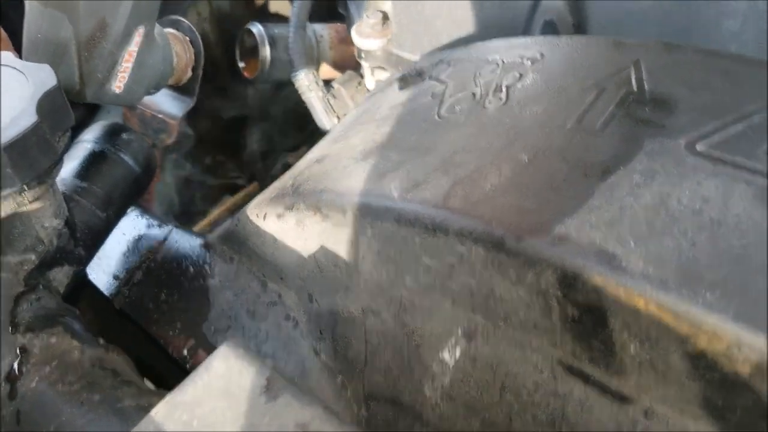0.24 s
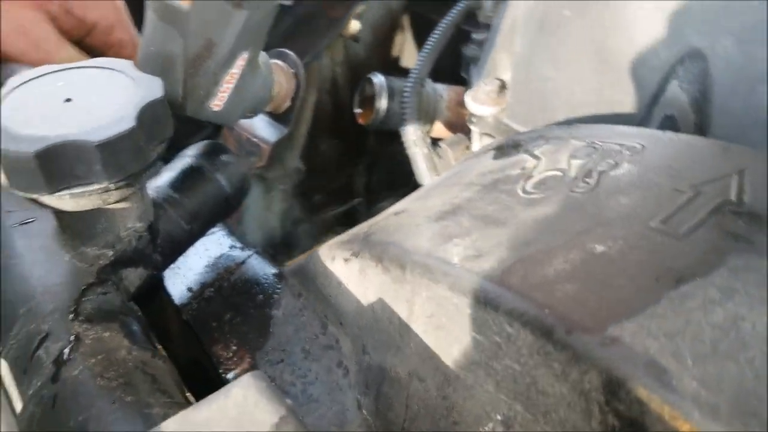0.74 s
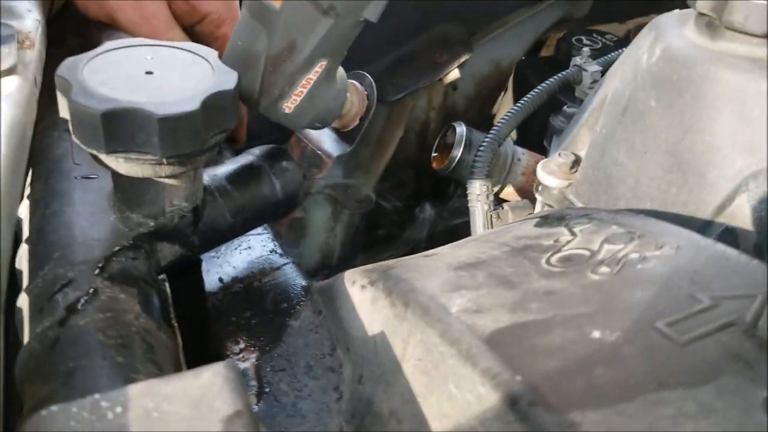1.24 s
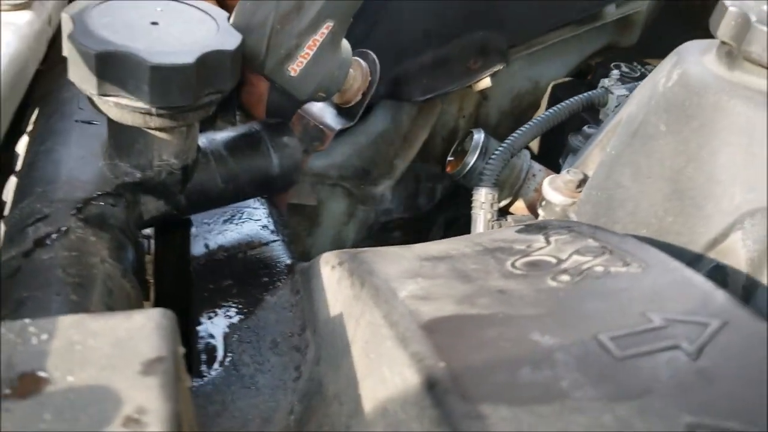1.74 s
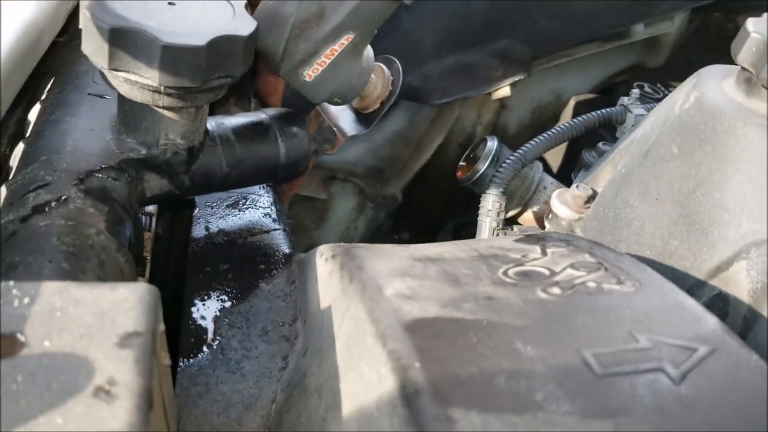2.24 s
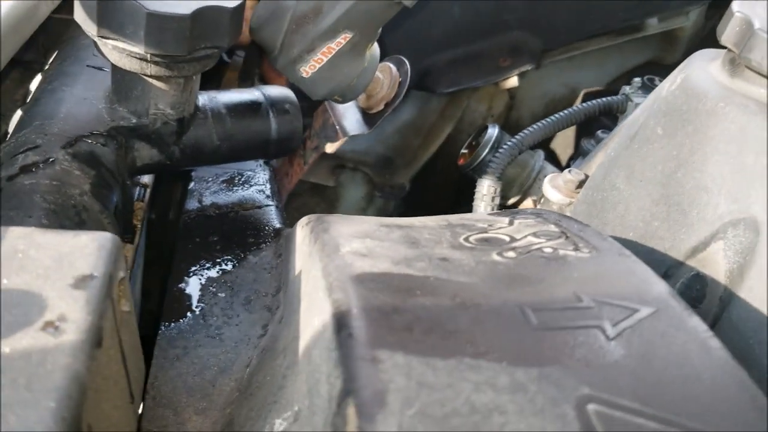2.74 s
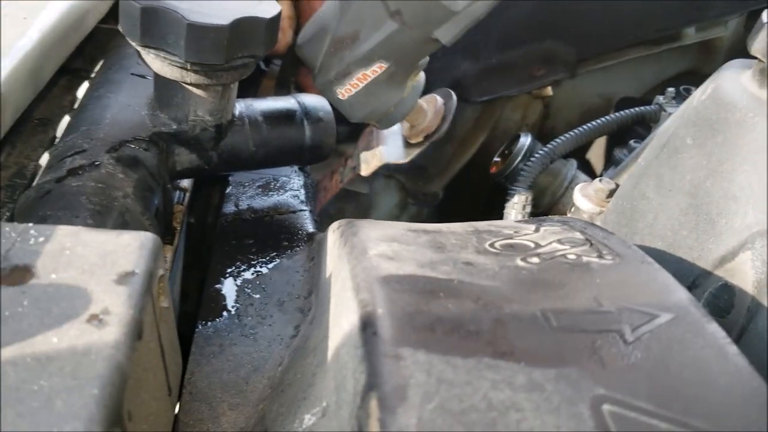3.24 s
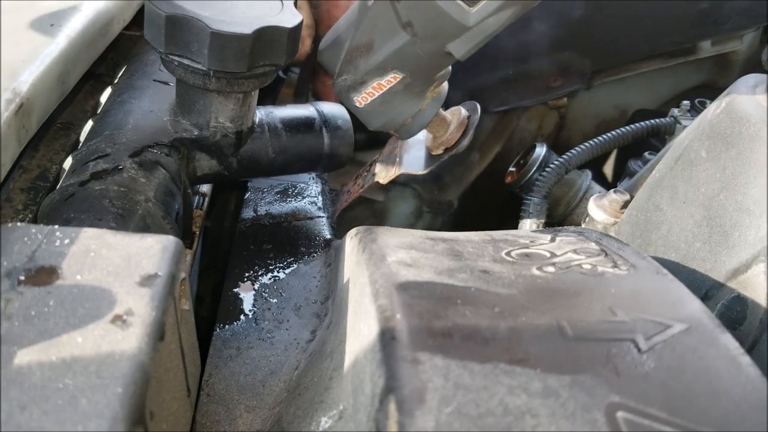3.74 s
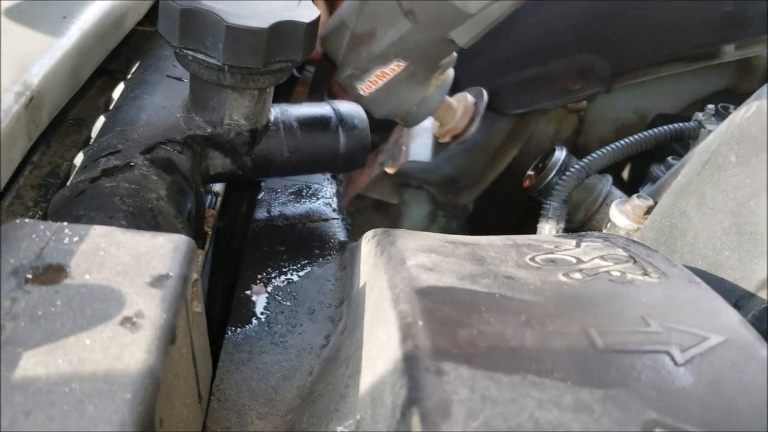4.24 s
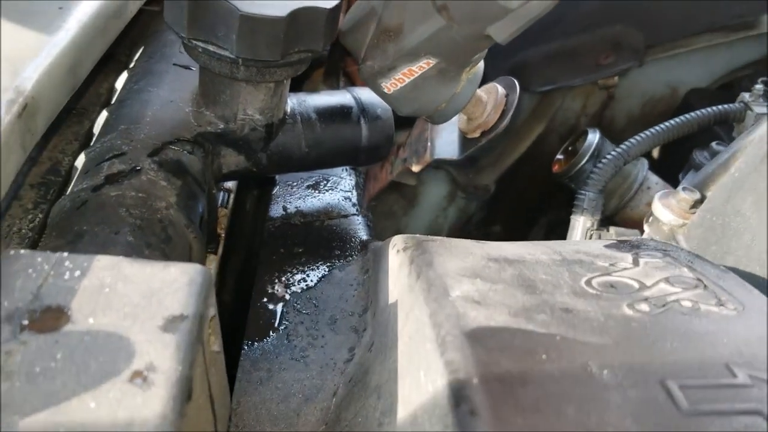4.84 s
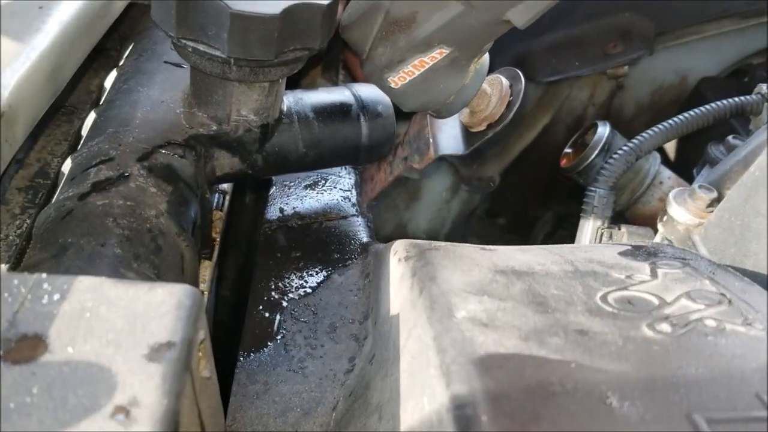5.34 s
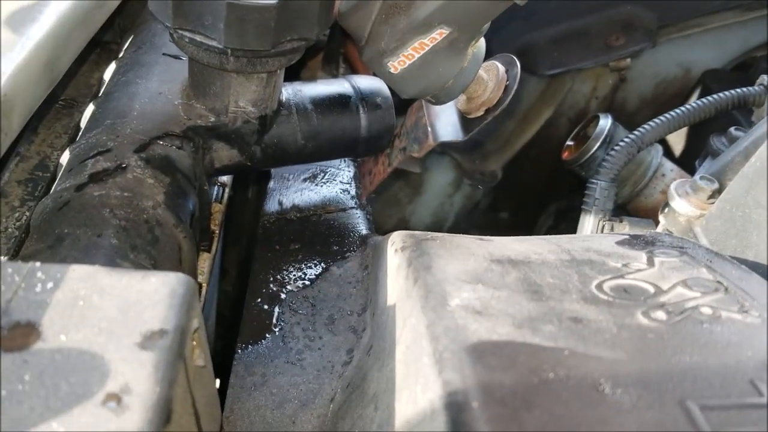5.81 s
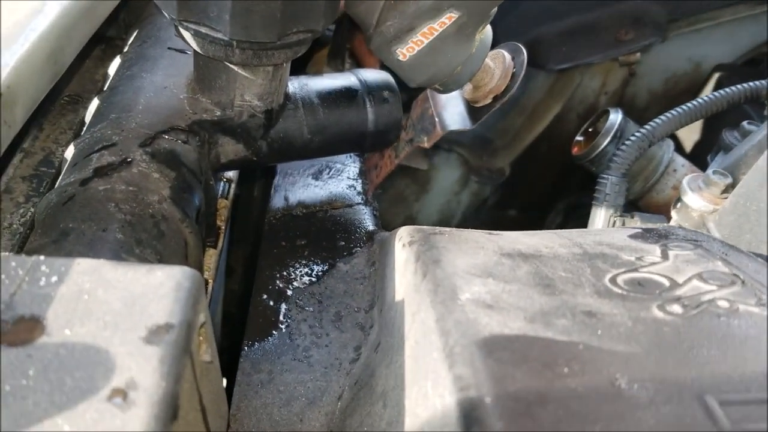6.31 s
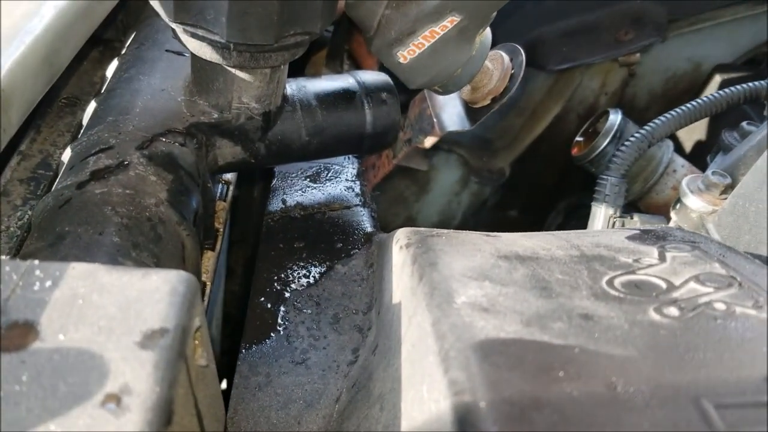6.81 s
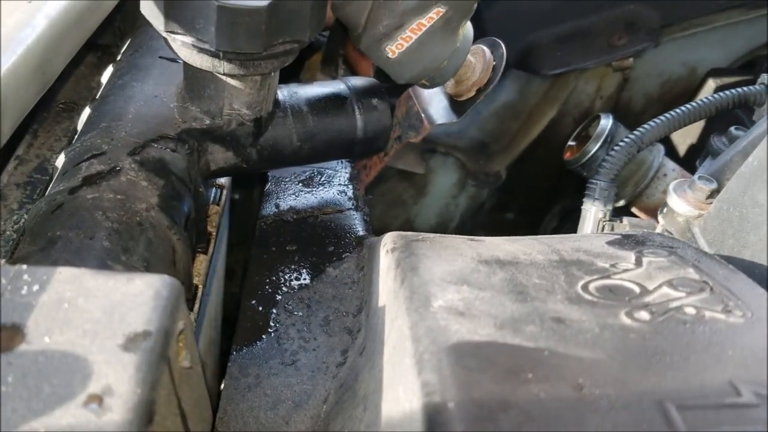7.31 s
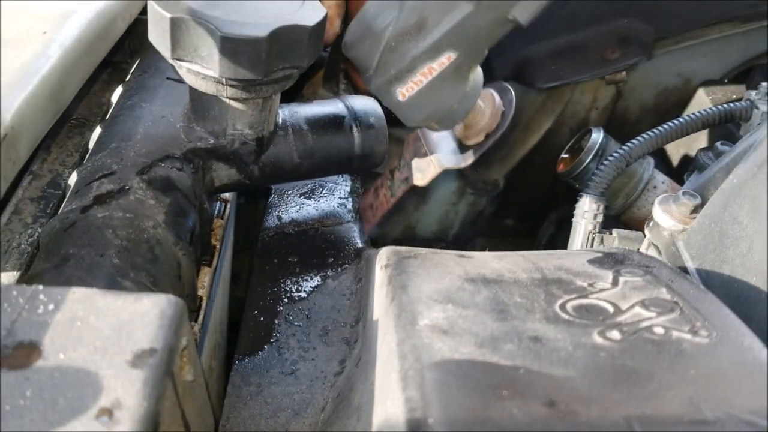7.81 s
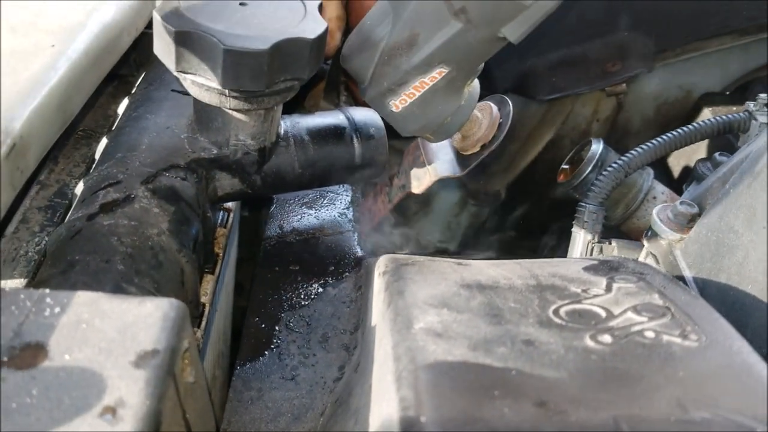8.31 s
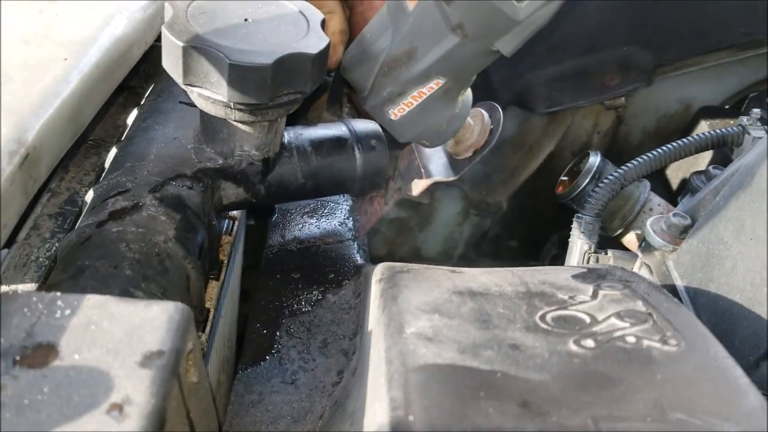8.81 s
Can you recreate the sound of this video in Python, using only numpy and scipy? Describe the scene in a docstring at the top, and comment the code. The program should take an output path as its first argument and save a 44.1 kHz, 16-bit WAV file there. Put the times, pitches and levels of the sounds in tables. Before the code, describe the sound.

An oscillating multi-tool saws a hollow plastic part in a car engine bay, very close to a stereo microphone. A low hum and nasal buzz sit under a bright, ringing, hissing blade, mostly on the left. It cuts off abruptly, leaves about half a second of quiet workshop air with faint metal ticks, then restarts and saws on, chattering at moments.

```python
"""An oscillating multi-tool saws at a plastic part in a car's engine bay, close to the stereo microphone. It
stops once and restarts. Its swing hums through the plastic, which buzzes at multiples of the stroke rate; the
teeth strike the steel blade in every stroke, evenly when they bite and in a rattle when they skate. The blade
rings and hisses, mostly on the left, and reflections from the bay smear its blows within milliseconds. The
housing rumbles, a thin whine, a metal tink, a click and the ping of the switch mark the restart, and the
workshop air is quiet."""
import sys
import numpy as np
from scipy import signal
from scipy.fft import rfft, irfft, next_fast_len
from scipy.io import wavfile
from scipy.ndimage import uniform_filter1d, map_coordinates

SR = 44100
rng = np.random.default_rng(int(sys.argv[2]) if len(sys.argv) > 2 else 0)


def wav_out(sig):
    """Save sig, one row per channel (or a flat mono array), as 16-bit PCM at SR to the path in sys.argv[1]."""
    wavfile.write(sys.argv[1], SR, np.round(np.clip(np.atleast_2d(sig).T, -1, 1) * 32767).astype(np.int16))


N = 399546


def amp(db):
    """Decibels to gain."""
    return 10 ** (np.asarray(db) / 20)


def unit(x):
    """x at rms 1."""
    return x / np.sqrt(np.mean(x ** 2) + 1e-20)


def seconds():
    """The time of every sample."""
    return np.arange(N) / SR


def colour(points, hz):
    """Gain of (frequency [Hz], gain [dB]) points on a log axis."""
    f, db = np.transpose(points)
    return amp(np.interp(np.log(hz + 1), np.log(f), db))


def curves(rows):
    """One value per sample for each column after the time; stretches are joined."""
    s, *cols = np.vstack(rows).T
    return [np.interp(seconds(), s, c) for c in cols]


def wobble(rate, at):
    """A smooth random curve, rate knots a second, read at the given seconds."""
    return map_coordinates(rng.standard_normal(4096), [at * rate], mode="mirror")


def bumps(events, length_s):
    """A smooth bump for each (time [s], strength) event, down to 1/e at length_s from its middle."""
    t = seconds()
    return sum(strength * np.exp(-((t - s) / length_s) ** 2) for s, strength in events)


def spells(events, edge_s):
    """A plateau with ramps of edge_s, centred on its ends, for each (start [s], end [s], strength) event."""
    t = seconds()
    total = 0
    for start, end, strength in events:
        inside_s = np.minimum(t - start, end - t)
        total = total + strength * np.clip(.5 + inside_s / edge_s, 0, 1)
    return total


def filtered(x, response):
    """x times a response of frequency."""
    m = next_fast_len(N + 8192, True)
    return irfft(rfft(x, m) * response(np.fft.rfftfreq(m, 1 / SR)), m)[..., :N]


def band(hz, low_hz, high_hz):
    """A band-pass with steep skirts."""
    return 1 / np.sqrt((1 + (low_hz / (hz + 1)) ** 40) * (1 + (hz / high_hz) ** 40))


# balance of the two microphone ports: (frequency [Hz], right minus left [dB])
PORT_SHADOW = [(150, -7), (600, 3.5), (1200, -6), (2000, -14.5), (3000, -15.5), (4000, -16), (5200, -22.5),
               (7000, -25), (10000, -32.5), (13000, -24), (15800, -34)]


def ports(hz):
    """Gains of the two microphone ports: the right one lies in the shadow of the camera."""
    right = colour(PORT_SHADOW, hz)
    return np.array([np.ones_like(right), right])


def steady(pair):
    """A stereo pair held at rms 1 over every thirtieth of a second."""
    power = uniform_filter1d((pair ** 2).mean(0), SR // 30)
    return pair / np.sqrt(np.abs(power) + 1e-20)


# motor speed, sagging as the hand leans on the cut: (time [s], stroke rate [strokes/s])
STROKE_RATE = [(0, 294), (.5, 293), (.75, 293.4), (1.4, 288.5), (2.14, 291.7), (2.9, 299), (3.03, 297),
               (3.28, 297), (3.43, 310), (4.24, 314), (4.82, 306), (5.4, 287.7), (5.7, 280), (5.8, 291),
               (6.79, 282.6), (7.11, 276), (7.42, 284.5), (7.6, 283), (7.8, 298), (8.28, 302),
               (8.53, 291.6), (9.06, 289)]


def stroke_rate():
    """The stroke rate follows the load of the hand on the cut."""
    return curves(STROKE_RATE)[0]


EASE_S, EASE_DB = .05, -5  # half length; drop of the cutting noise at depth 1
# the hand eases the blade off the plastic for a moment: (time [s], depth [0-1])
EASE_MOMENTS = [(2.28, 0.32), (7.67, .6), (7.83, 0.8), (8.6, 0.7), (8.69, .5)]


def easing():
    """Less pressure on the plastic lets the blade skate."""
    return bumps(EASE_MOMENTS, EASE_S)


BITING_HZ, FREE_HZ = 294, 310.9  # the teeth bite below the first stroke rate and skate above the second
BITING_RATTLE, FREE_RATTLE, EASE_RATTLE = .3, .9, 0.66  # looseness biting and skating; rise at ease depth 1


def looseness():
    """The less the cut loads the motor, the faster it runs and the more the blade skates."""
    free = np.clip((stroke_rate() - BITING_HZ) / (FREE_HZ - BITING_HZ), 0, 1)
    loose = BITING_RATTLE + (FREE_RATTLE - BITING_RATTLE) * free
    return np.clip(loose + EASE_RATTLE * easing(), 0, 1)


# at strength 1: half length [s]; lift of the whole cut, of the knock, of the housing [dB]; added looseness
SNAG_S, SNAG_DB, SNAG_KNOCK_DB, SNAG_RUMBLE_DB, SNAG_RATTLE = .02, 0.5, 2, 7.5, 0.9
# the blade snags and chatters for a moment: (time [s], strength [0-1])
SNAG_MOMENTS = [(.53, 0.4), (2.86, .2), (3.019, 1), (3.081, 0.68), (4.41, 1), (4.981, .4), (7.52, .88),
                (7.732, .6), (8.512, 1)]


def snagging():
    """A snag catches the blade and shakes it loose for an instant."""
    return bumps(SNAG_MOMENTS, SNAG_S)


# at strength 1: onset and end [s]; change of the plastic, of the blade, of the housing; flutter [dB]
BOUNCE_EDGE_S, BOUNCE_DB, BOUNCE_BLADE_DB, BOUNCE_RUMBLE_DB, BOUNCE_FLUTTER_DB = .015, 0.5, -0.5, 1.5, 1
# bouts in which the blade bounces in the cut: (start [s], end [s], strength [0-1])
BOUNCE_BOUTS = [(2.83, 3.12, 0.6), (4.94, 5.15, .8), (7.955, 8.475, .8)]


def bouncing():
    """A bouncing blade keeps losing and regaining contact."""
    return spells(BOUNCE_BOUTS, BOUNCE_EDGE_S)


OFF_S, ON_S = 3.485, 4.025  # the tool starts to stop; it is back at full swing
STOP_DB_PER_S, COAST_DB_PER_S, START_DB_PER_S = 518.5, 376, 595  # cut dies, housing dies, both come back


def running(stop_db_per_s):
    """Gain of the tool: it dies quickly when switched off and swings up again."""
    t = seconds()
    stopping_db = stop_db_per_s * (OFF_S - t)
    starting_db = START_DB_PER_S * (t - ON_S)
    return amp(np.minimum(0, np.maximum(stopping_db, starting_db)))


# hum of the swing before port balance and flutter, before and after the stop: (time [s], level [dB])
SWING_HUM = [
    [(0.06, -23.5), (0.67, -18), (0.81, -25), (1.19, -16.5), (1.5, -25), (1.68, -19), (2.13, -31.5),
     (2.24, -27), (2.29, -40), (2.46, -22), (2.79, -28), (2.82, -37.5), (3.05, -23), (3.26, -24.5),
     (3.45, -48), (3.46, -54)],
    [(4.08, -57), (5.27, -22.5), (5.47, -25.5), (5.63, -42.5), (5.73, -25), (6.19, -16.5), (6.56, -27),
     (6.65, -21.5), (7.01, -18.5), (7.16, -37), (7.34, -33), (7.53, -16.5), (8.12, -36), (8.46, -31.5),
     (8.5, -23.5), (9.06, -21)],
]
# its overtones likewise: (time [s], second order level [dB], third order level [dB])
SWING_OVERTONES = [
    [(0.0, -29, -26.5), (0.53, -24.5, -27), (1.08, -20.5, -43), (1.31, -21.5, -29), (1.85, -29, -31.5),
     (2.64, -31.5, -27), (2.91, -33, -36), (3.32, -47.5, -34.5), (3.46, -53, -42.5)],
    [(4.05, -55.5, -67), (4.94, -41, -26), (5.36, -36, -49), (5.6, -53, -36), (5.82, -36, -46),
     (6.46, -30, -31.5), (6.94, -35, -37), (8.79, -36.5, -42.5), (9.06, -42.5, -39)],
]


def swing(turns, rattle):
    """The swinging head drives tool and plastic at its lowest orders; rattling makes them flutter."""
    t = seconds()
    hum = np.zeros((2, N))
    for k, db in enumerate(curves(SWING_HUM) + curves(SWING_OVERTONES), 1):
        flutter_db = 2.54 * rattle * wobble(70, t) + .5 * k * wobble(14, t)
        slip = rattle * (0.096 * wobble(13, t) + 0.0079 * wobble(60, t))  # of a stroke
        apart = (k / 3) ** 2
        # the right port hears the swing a little later; the higher the order, the more the ports differ
        lag = np.array([[0], [1]]) * (0.034 + 0.062 * apart * wobble(1.986, t))
        left_db = .7 - 1.3 * (k > 1) + 1.5 * apart * wobble(2, t)
        port_db = 1.2 * apart + np.array([left_db, -left_db])
        phase = 2 * np.pi * k * (turns + slip - lag)
        hum += np.sqrt(2) * amp(db + flutter_db + port_db) * np.sin(phase)
    return hum


def scrape(turns, depth):
    """Friction noise that swells once a stroke, unrelated at the two ports."""
    return unit(rng.standard_normal((2, N)) * (1 + depth * np.cos(2 * np.pi * turns)))


# the part's two main resonances move with the point of contact: (time [s], knock [Hz], rasp [Hz])
CONTACT_RESONANCES = [(0, 1300, 2620), (.55, 1664, 2580), (.95, 1176, 3085), (1.25, 1700, 3570),
                      (1.8, 1250, 3700), (2.3, 1250, 2437), (2.85, 1194, 2430), (3.1, 1650, 2340),
                      (4.9, 1400, 2480), (5.3, 1140, 3450), (5.75, 1716, 2903), (7.1, 1790, 2830),
                      (7.35, 1130, 3300), (7.7, 1704, 2314), (8, 1230, 2390), (8.25, 1767, 2365),
                      (9.06, 1830, 2840)]


def buzz(turns, rattle, bounce, wander, lift_db, count):
    """Stroke orders from the fourth up: moving resonances pick some out, and a loose blade makes all flutter."""
    t = seconds()
    knots = t[::32]  # gains move slowly enough for every 32nd sample

    def chance(rate):
        return wobble(rate, knots) + 1j * wobble(rate, knots)

    def bump(hz, width_hz):
        return np.exp(-(hz / width_hz) ** 2)

    controls = [rattle, bounce, stroke_rate()] + curves(CONTACT_RESONANCES)
    loose, bounces, speed_hz, knock_hz, rasp_hz = (np.interp(knots, t, c) for c in controls)
    stroke = np.exp(2j * np.pi * turns)
    order = stroke ** 3
    out = np.zeros((2, N))
    for k in range(4, count):
        order = order * stroke
        near = bump(k * speed_hz - knock_hz, 210) + bump(k * speed_hz - rasp_hz, 300)
        bite = 1 + wander * (chance(4) + .9 * chance(15)) + (.35 * loose + .5 * bounces) * chance(40)
        shake = loose ** 1.5 * (k / 8) * (1.1 * chance(50) + .35 * chance(130))
        resonance = amp(lift_db * near * (1.5 - loose ** 2 + .4 * bounces))
        left = resonance * (bite + shake) * np.exp(.09j * k * k)  # phase grows with the square of the order
        right_phase = 1.21 * wobble(1.507, knots) - 1.6
        right = left * (1 + 2.23 * chance(2.063)) * np.exp(1j * right_phase)
        out += [(np.interp(t, knots, gain) * order).real for gain in (left, right)]
    return unit(out)


KNOCK_DB, RASP_DB = 3.5, 3  # added to the two level columns
# response of the hollow part: (frequency [Hz], gain [dB])
PLASTIC_BODY = [(1170, -4), (1460, -9), (1750, -1.5), (2050, -2), (2350, 1.5), (2750, -1.5), (3200, -2),
                (3700, 0), (4200, -3), (4700, -8), (5300, -7)]
# buzz before the added gains, before and after the stop: (time [s], knock level [dB], rasp level [dB])
PLASTIC_BUZZ = [
    [(0.04, -24, -21.5), (0.38, -31.5, -22.5), (0.57, -28, -28), (0.76, -29.5, -28.5), (0.95, -24, -28.5),
     (1.08, -28, -26), (1.67, -24.5, -27.5), (2.36, -33.5, -29.5), (2.8, -24, -32), (2.82, -23.5, -28),
     (3.33, -29.5, -26), (3.44, -38.5, -35.5)],
    [(4.08, -43, -37.5), (4.51, -39, -35.5), (4.95, -25.5, -22.5), (6.38, -29.5, -31.5),
     (6.6, -26.5, -26.5), (7.48, -29, -31), (7.8, -31.5, -34), (8.0, -25, -26), (8.41, -29, -29.5),
     (8.66, -35, -36.5), (8.75, -33.5, -30), (9.06, -31.5, -34.5)],
]


def plastic(turns, rattle, snag, bounce):
    """Tooth blows buzz in the hollow plastic part, a low knock and a higher rasp; a skating blade rubs more."""
    t = seconds()
    knock_db, rasp_db = curves(PLASTIC_BUZZ)
    rub = (.04 + .17 * rattle + 2.2 * looseness() ** 6) * scrape(turns, depth=.6)
    tones = buzz(turns, rattle, bounce, wander=0.5, lift_db=4.0, count=19)

    def body(drive, low_hz, high_hz):
        return filtered(drive, lambda hz: colour(PLASTIC_BODY, hz) * band(hz, low_hz, high_hz) * ports(hz))

    knock = body(tones + rub, 1075, 2088)
    rasp = body(tones + 2 * rub, 2146, 6530)
    # the teeth grab and let go
    grab_db = 1.3 * wobble(12, t) + bounce * (BOUNCE_DB + BOUNCE_FLUTTER_DB * wobble(45, t))
    knock_gain = amp(knock_db + KNOCK_DB + SNAG_KNOCK_DB * snag)
    rasp_gain = amp(rasp_db + RASP_DB)
    return amp(grab_db) * (knock_gain * steady(knock) + rasp_gain * steady(rasp))


def pulses(times, sizes):
    """Band-limited clicks placed between samples."""
    at = times.reshape(-1, 1) * SR
    taps = np.floor(at) + np.arange(-7, 9)
    shape = np.sinc(taps - at) * np.cos(np.pi * (taps - at) / 16) ** 2
    places = np.clip(taps, 0, N).astype(int)
    return np.bincount(places.ravel(), (shape * sizes.reshape(-1, 1)).ravel(), N + 1)[:N]


def teeth(turns, rattle, scatter_s, drift, size_db, fall_db, count):
    """Several teeth catch in every stroke; their places creep, and looseness scatters timing and force."""
    t = seconds()
    strokes = np.arange(int(turns[-1]))
    starts = np.interp(strokes, turns, t)
    loose = np.interp(starts, t, rattle)
    times, sizes = [], []
    for tooth in range(count):
        place = tooth / count + 0.0583 * wobble(.5, starts) + drift * wobble(6, starts)  # of a stroke
        jitter_s = scatter_s * loose * rng.standard_normal(len(starts))
        times.append(np.interp(strokes + place, turns, t) + jitter_s)
        uneven_db = size_db * loose * rng.standard_normal(len(starts))
        force_db = fall_db * tooth + 0.98 * wobble(12, starts) + uneven_db
        sizes.append((-1) ** tooth * amp(force_db))
    return unit(pulses(np.array(times), np.array(sizes)))


def bay(x, spread_s):
    """Close reflections smear each blow in time without colouring it, differently at each port."""
    t = np.arange(2048) / SR
    tail = rfft(rng.standard_normal((2, len(t))) * np.exp(-t / spread_s))
    smear = np.roll(irfft(tail / np.abs(tail)), 256, axis=1)  # phase only
    return signal.fftconvolve(x, smear, axes=1)[:, 256:256 + N]


RING_DB, HISS_DB = 2.5, 3  # added to the two level columns
# response of the steel: (frequency [Hz], gain [dB])
BLADE_MODES = [(5200, -7), (6000, -5), (6600, 2), (7300, 4), (7900, 0.5), (8500, -12.5), (9100, -6.5),
               (9900, 1.5), (10900, -9.5), (11600, -3.5), (12500, -8.5), (13700, -7.5), (15000, -12.5),
               (15800, -12.5)]
# blade before the added gains, before and after the stop: (time [s], ring level [dB], hiss level [dB])
BLADE_SOUND = [
    [(0.0, -28, -21), (0.56, -23.5, -25), (0.69, -28, -27), (0.76, -27.5, -34.5), (1.54, -22.5, -24),
     (2.1, -21, -25.5), (2.21, -25, -33), (3.34, -28, -19.5), (3.46, -35.5, -28.5)],
    [(4.08, -32.5, -27.5), (5.16, -23, -20), (6.13, -28, -25.5), (6.78, -27, -23), (7.88, -26, -26),
     (7.99, -25.5, -19), (8.7, -30, -25.5), (8.84, -26.5, -23), (9.06, -29.5, -23)],
]
# the blade's angle shifts its hiss towards the highest modes: (time [s], lift [dB])
EDGE_LIFT = [(0, 10), (1.2, 2.5), (2.9, -4), (3.35, 3.5), (4.1, -2), (7.6, -1.5), (8.05, 1), (9.06, -4)]


def blade(turns, rattle):
    """The same strokes ring the steel blade; its top range is mostly the hiss of scraping teeth."""
    t = seconds()
    ring_db, hiss_db = curves(BLADE_SOUND)
    blows = teeth(turns, rattle, scatter_s=.000028, drift=.004, size_db=3.5, fall_db=-1, count=7)
    rub = (.05 + 1.1 * rattle + .7 * rattle ** 3) * scrape(turns, depth=.5)
    drive = bay(blows + rub, spread_s=.0008)

    def steel(low_hz, high_hz):
        return filtered(drive, lambda hz: colour(BLADE_MODES, hz) * band(hz, low_hz, high_hz) * ports(hz))

    ring = steel(5400, 8700)
    hiss = steel(8700, 10700) + amp(curves(EDGE_LIFT)[0]) * steel(10900, 17000)
    # the blade grabs and lets go
    grab_db = 1.2 * wobble(24, t) + .5 * wobble(110, t) + 0.52 * wobble(300, t)
    ring_gain = amp(ring_db + RING_DB + grab_db + 1.2 * wobble(35, t))
    hiss_gain = amp(hiss_db + HISS_DB + grab_db + 0.91 * wobble(35, t))
    return ring_gain * steady(ring) + hiss_gain * steady(hiss)


MOTOR_DB, FREE_RUMBLE_DB = -43, -3.5  # level before load and swell; change at looseness 1
# response of the housing: (frequency [Hz], gain [dB])
HOUSING_BODY = [(25, -25), (70, -9), (140, -4), (280, 1.5), (430, -6.5), (800, -3), (1100, -1), (1800, -18)]


def motor(snag, bounce):
    """The housing rumbles while the motor runs: less without load, harder when the blade bounces or snags."""
    air = rng.standard_normal(N) + 1.5 * rng.standard_normal((2, N))  # partly shared by the ports
    rumble = unit(filtered(air, lambda hz: colour(HOUSING_BODY, hz) * ports(hz)))
    load_db = SNAG_RUMBLE_DB * snag + BOUNCE_RUMBLE_DB * bounce + FREE_RUMBLE_DB * looseness()
    swell_db = 2.0 * wobble(10, seconds())
    return amp(MOTOR_DB + load_db + swell_db) * rumble


# colour of the workshop air: (frequency [Hz], gain [dB])
AIR_COLOUR = [(15, -44.5), (25, -17), (59, 0.5), (200, -11), (604, -26), (1430, -29), (2330, -34.5),
              (2730, -30.5), (4820, -28.5), (8730, -17.5), (11700, -14), (15800, -29.5)]


def ambient():
    """The quiet air of the workshop, noise unrelated at the two ports."""
    air = rng.standard_normal((2, N))
    return amp(-65.0) * unit(filtered(air, lambda hz: colour(AIR_COLOUR, hz) * ports(hz)))


WHINE_DB = -43  # peak before flicker and port balance
FREE_FROM_S, FREE_TO_S, WHINE_FADE_S = 3.5, 5, .08  # the blade sings thinly while it swings free


def whine(pitch_hz, flicker_db):
    """A tone of the unloaded blade, made fuzzy by random phase and a flickering level."""
    t = seconds()
    free = spells([(FREE_FROM_S, FREE_TO_S, 1)], WHINE_FADE_S)
    level = amp(WHINE_DB + flicker_db * wobble(30, t)) * free
    return level * np.sin(2 * np.pi * pitch_hz * t + 1.2 * wobble(220, t)) * amp([[6], [-10]])


# a metal tink, a click and the ping of the switch around the restart, level before port balance: (time [s],
# level [dB], pitch [Hz], 60 dB fade [s])
RESTART_PINGS = [(3.702, -48, 11930, 0.14), (3.917, -59, 1850, .04), (3.966, -49, 1990, 0.28)]


def tinks():
    """Short pings around the restart, each one fading tone."""
    t = seconds()
    out = np.zeros(N)
    for s, db, hz, t60 in RESTART_PINGS:
        age = np.maximum(t - s, 0)
        out += amp(db - 60 * age / t60) * np.sin(2 * np.pi * hz * age)
    return out * amp([[3], [-8]])  # nearer the left port


def scene():
    """One shaft angle drives the swing, the plastic and the blade."""
    snag, bounce = snagging(), bouncing()
    rattle = np.clip(looseness() + SNAG_RATTLE * snag, 0, 1.2)
    turns = np.cumsum(stroke_rate() + 2.5 * rattle * wobble(35, seconds())) / SR
    contact = amp(SNAG_DB * snag + EASE_DB * easing())
    sawn_plastic = plastic(turns, rattle, snag, bounce)
    sawing_blade = amp(BOUNCE_BLADE_DB * bounce) * blade(turns, rattle)
    cutting = contact * (sawn_plastic + sawing_blade)
    head = swing(turns, rattle) + cutting + whine(pitch_hz=4430, flicker_db=1)
    tool = running(STOP_DB_PER_S) * head + running(COAST_DB_PER_S) * motor(snag, bounce)
    return tool + ambient() + tinks()


TOP_HZ = 15800


def record(dry):
    """The camera clips at full scale and keeps nothing above its band limit."""
    return filtered(np.clip(dry, -1, 1), lambda hz: hz < TOP_HZ)


dry = scene()
out = record(dry)
wav_out(out)
```